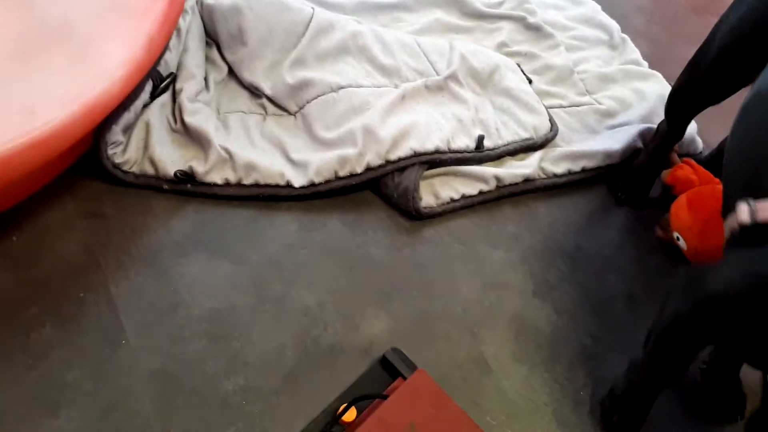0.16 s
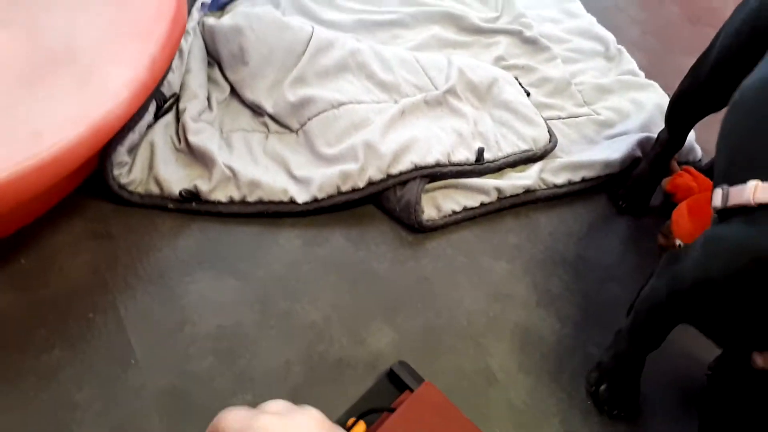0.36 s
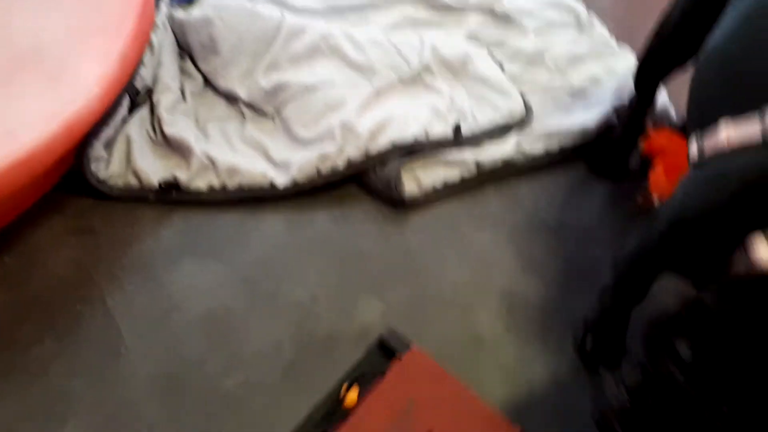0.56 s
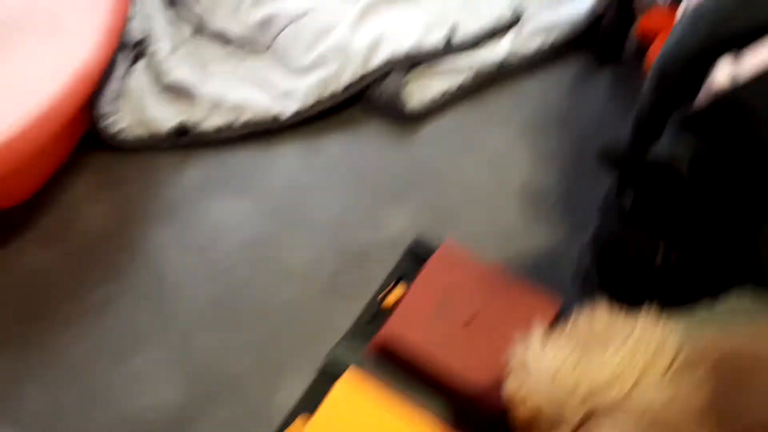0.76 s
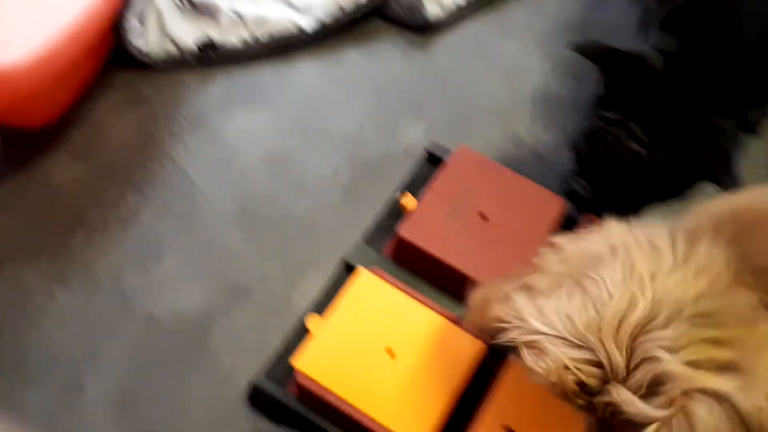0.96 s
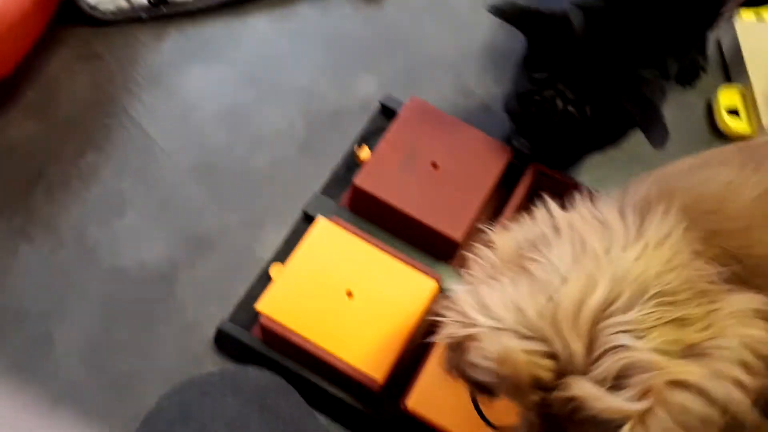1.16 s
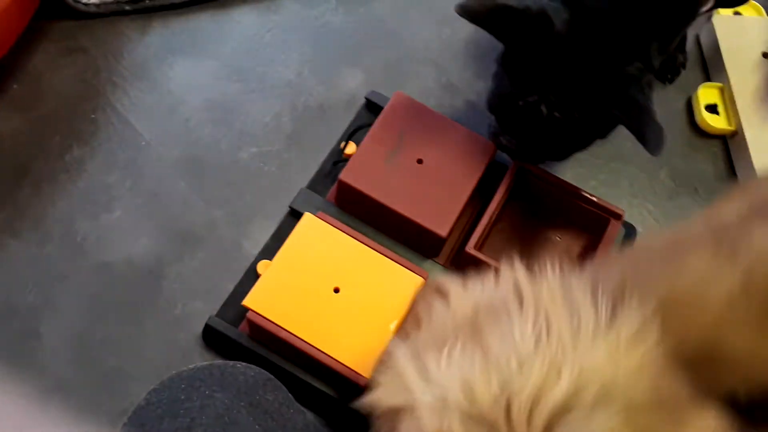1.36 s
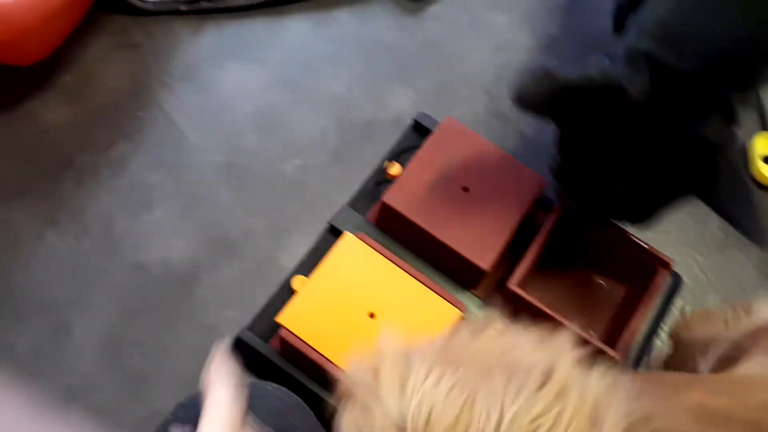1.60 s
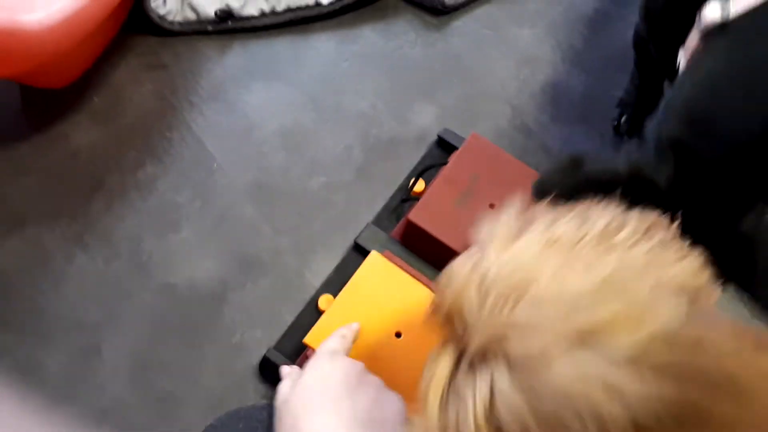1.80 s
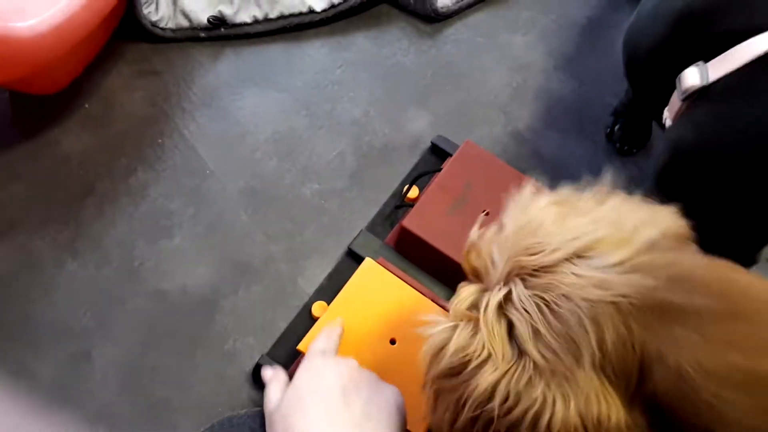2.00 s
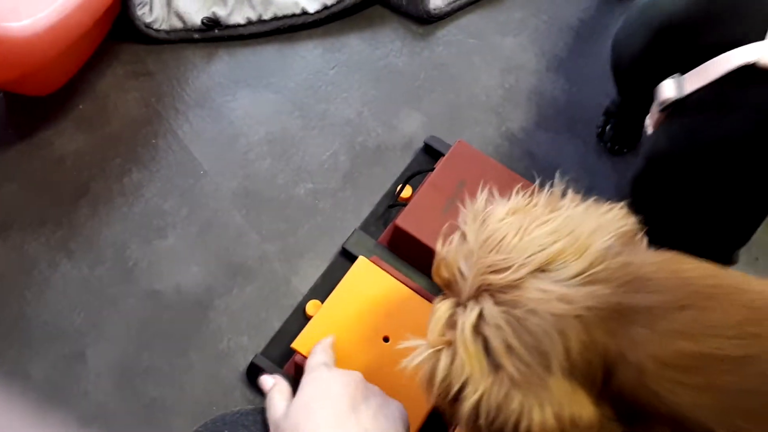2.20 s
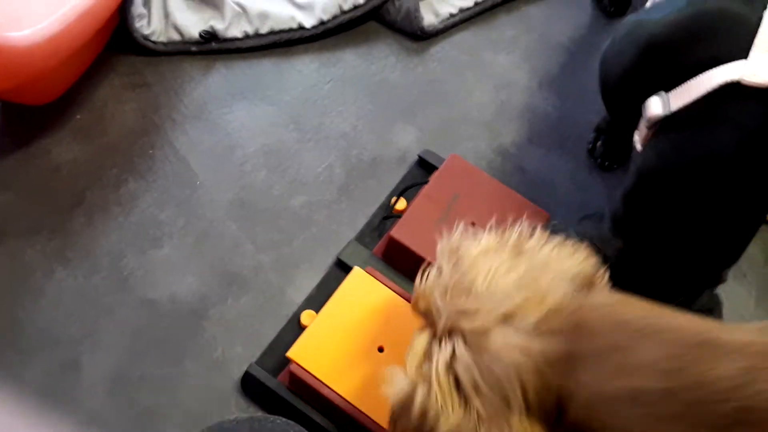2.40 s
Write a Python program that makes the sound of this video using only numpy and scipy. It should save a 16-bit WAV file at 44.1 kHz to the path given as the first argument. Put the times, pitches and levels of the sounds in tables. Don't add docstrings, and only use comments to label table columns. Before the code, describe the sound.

Plastic puzzle board clatter, close in a small, lively room. Airy sniffing opens; at 0.2 s a light lid drops and bounces brightly, then a tray slams loudly at 0.45 s and rattles briefly. From 0.8 to 1.7 s it is quieter, with faint dull paw steps and soft sniffs. At 1.78 s pegs click and the board knocks, a piece scrapes in tiny catches at 1.92, boxy bumps follow at 2.03 and 2.16, then soft steps.

```python
import sys
import numpy as np
from scipy import signal
from scipy.fft import rfft, irfft
from scipy.io import wavfile
from scipy.ndimage import uniform_filter1d

SR = 44100
rng = np.random.default_rng(int(sys.argv[2]) if len(sys.argv) > 2 else 0)


def how_loud(loudness_db):
    steps = np.asarray(loudness_db, float) / 20
    return 10 ** steps


def transcribe(signal):
    frames = np.atleast_2d(signal).T
    limited = np.clip(frames, -1, 1)
    pcm = np.round(limited * 32767).astype(np.int16)
    wavfile.write(sys.argv[1], SR, pcm)


N = 108045
SPAN = 6000


def evened(x):
    return x / np.sqrt(np.mean(x ** 2) + 1e-20)


def read(points, hz):
    f, value = np.transpose(points)
    return np.interp(np.log(hz + 1), np.log(f + 1), value)


def add(mix, s, sound):
    part = mix[..., round(s * SR):][..., :sound.shape[-1]]
    part += sound[..., :part.shape[-1]]


def butter(x, order, hz, kind):
    return signal.sosfilt(signal.butter(order, hz, kind, fs=SR, output="sos"), x)


# f/Hz, level/dB
TICK = [(500, -10), (1500, 3), (4500, -2.5), (7600, -0.5), (9500, -11), (13500, -11.5), (16500, -25.5)]


def struck(hits, modes, setting):
    ring_db, trim_db, cycles, lean_db, free_s = setting
    tick_t60_s, soft_share = 0.013, 0.65
    choke_db, choke_s, choke_hz = -17, 0.0025, 750
    port_rad, side_hz = 1.85, 950
    mono, t = np.zeros(N), np.arange(SPAN) / SR
    hz, db, t60 = np.transpose(modes)[:, :, None]
    colour = how_loud(read(TICK, np.fft.rfftfreq(SPAN, 1 / SR)))
    choke_share = 1 / (1 + (hz / choke_hz) ** 4)
    choke = how_loud(choke_db * np.clip((t - free_s) / choke_s, 0, 1) * choke_share)
    attack = (1 - np.exp(-t * hz / cycles)) ** 2
    hardest_db = max(tick_db - blow_db for _, blow_db, tick_db in hits)
    for s, blow_db, tick_db in hits:
        treble = np.clip(np.log2(hz / 500) / 3, 0, 1)
        soft_db = soft_share * (tick_db - blow_db - hardest_db) * treble
        luck = rng.standard_normal((len(modes), 2, 1))
        level = how_loud(db + soft_db + 1.5 * luck[:, 0] - 60 * t / t60)
        ring = level * np.sin(2 * np.pi * hz * (1 + 0.01 * luck[:, 1]) * t)
        ring = ring * attack * choke
        tick = evened(irfft(rfft(rng.standard_normal(SPAN)) * colour))
        add(mono, s, how_loud(blow_db + ring_db) * ring.sum(0))
        add(mono, s, how_loud(tick_db + trim_db - 60 * t / tick_t60_s) * tick)
    mono = butter(mono, 4, 0.8 * hz.min(), "high")
    f, side = np.fft.rfftfreq(N, 1 / SR), np.array([[0.5], [-0.5]])
    phase = np.exp(1j * side * port_rad * f ** 2 / (f ** 2 + side_hz ** 2))
    lean = how_loud(side * lean_db * f / (f + 2500))
    return irfft(rfft(mono) * phase * lean, N)


# t/s, blow level/dB, tick level/dB
LID_HITS = [(0.2058, 0, -28), (0.215, -15.5, -50.5), (0.223, -16, -43), (0.232, -17, -52.5),
            (.241, -22.5, -53), (.251, -22, -56.5), (0.2605, -11, -49), (.269, -26, -56.5),
            (0.277, -24.5, -57.5), (0.287, -22, -60.5), (.299, -34.5, -59), (0.305, -26, -45.5),
            (0.309, -36, -39), (0.339, -22, -54.5), (.35, -36.5, -60), (0.3615, -26, -62.5),
            (.373, -25, -64), (0.381, -23, -57), (.393, -34, -67.5), (.426, -48.5, -49)]
# f/Hz, level/dB, t60/s
LID_MODES = [(443.3, -6, 0.04), (508, -3, 0.03), (1060, -4, 0.025), (1494, 4.5, 0.018), (2110, 3, 0.01),
             (2374, 3, 0.017), (3300, -4.5, .008), (4100, -2, 0.016)]
LID_SET = (0.7, 3.5, 1.05, 5, 0.33)


def lid():
    return struck(LID_HITS, LID_MODES, LID_SET)


# t/s, blow level/dB, tick level/dB
TRAY_HITS = [
    (.4435, -24.5, -70),
    (.4475, -4.5, -14),
    (.4502, -10, -18.5),
    (.4608, -18.5, -39),
    (.476, -22, -40),
    (.483, -23, -42),
    (.491, -19, -40),
    (.502, -23, -43),
    (.513, -23, -32.5),
    (.535, -25.5, -30),
]
# f/Hz, level/dB, t60/s
TRAY_MODES = [(385.7, 4, 0.13), (422, 0.5, 0.09), (530, -3.5, 0.065), (690.6, -1.5, 0.059),
              (831, -1.5, 0.051), (1061, -3, 0.037), (1217, -3, 0.021), (1411, -4.5, 0.042),
              (1861, -10.5, 0.069), (2560, -14, .02), (4127, -4, 0.031), (4280, -6, 0.02),
              (5060, -17.5, 0.059)]
TRAY_SET = (-4.5, 2, 0.38, 12, -0.17)


def tray():
    return struck(TRAY_HITS, TRAY_MODES, TRAY_SET)


# t/s, blow level/dB, tick level/dB
PEG_HITS = [
    (1.7765, -18, -39.5),
    (1.779, -24, -36),
    (1.782, -31, -33),
    (1.789, -25, -41),
    (1.796, -38.5, -56),
    (2.218, -40, -49.5),
]
# f/Hz, level/dB, t60/s
PEG_MODES = [(502, -1, 0.024), (1706, -8.5, .04), (1816, -7, 0.083), (2800, -8, 0.03), (3770, 2, 0.032),
             (4050, 1, 0.039), (7100, -10.5, 0.02)]
PEG_SET = (-1.5, 5.5, 1.4, 9, 2.5)


def pegs():
    return struck(PEG_HITS, PEG_MODES, PEG_SET)


# t/s, blow level/dB, tick level/dB
BOARD_HITS = [
    (1.8015, -31, -55),
    (1.8065, -17.5, -47),
    (1.811, -18, -27.5),
    (1.816, -11.5, -29),
    (1.8255, -19.5, -52),
    (1.8355, -25, -47),
    (1.8405, -22, -48),
]
# f/Hz, level/dB, t60/s
BOARD_MODES = [(199.6, 1, 0.042), (420, -0.5, 0.034), (487, -3, 0.065), (866, -12, 0.055),
               (1324, -8, 0.018), (1682, -8, 0.046), (2666, -14.5, 0.035)]
BOARD_SET = (0.2, 8.6, 0.65, 1.9, 0.015)


def board():
    return struck(BOARD_HITS, BOARD_MODES, BOARD_SET)


# t/s, blow level/dB, tick level/dB
BOX_HITS = [(2.026, -42, -30.5), (2.029, -20.5, -29), (2.0375, -20.5, -36), (2.05, -33, -55),
            (2.057, -37, -53), (2.068, -39, -55), (2.075, -39.5, -55), (2.087, -34, -66), (2.097, -43, -56),
            (2.114, -43, -68), (2.123, -37.5, -70), (2.148, -40, -76), (2.155, -35.5, -32),
            (2.159, -24, -38.5), (2.172, -23.5, -51), (2.19, -36, -54), (2.2, -39, -60), (2.211, -35, -65),
            (2.252, -37.5, -79), (2.446, -44.5, -63)]
# f/Hz, level/dB, t60/s
BOX_MODES = [(191, -10, 0.074), (398, -2, 0.074), (439.5, 4, 0.038), (539, -9, 0.05), (874, -5.5, 0.021),
             (1420, -9, 0.062), (1819, -1.5, 0.039)]
BOX_SET = (0.24, 5.6, 0.65, 4.3, 0.0072)


def box():
    return struck(BOX_HITS, BOX_MODES, BOX_SET)


# t/s, blow level/dB, tick level/dB
SLIDE_HITS = [
    (1.9195, -26, -49),
    (1.9245, -32, -33.5),
    (1.931, -34, -57),
    (1.937, -37, -48),
    (1.9425, -29.5, -33),
    (1.9455, -31.5, -36),
    (1.95, -35, -39.5),
    (1.957, -33.5, -52),
    (1.964, -47, -52),
    (1.972, -42, -61),
]
# f/Hz, level/dB, t60/s
SLIDE_MODES = [(462, -2, 0.034), (1060, -1, .02), (1468, 0, 0.035), (1930, -8, 0.03), (2980, -10, 0.026),
               (4140, -0.5, 0.016)]
SLIDE_SET = (3.3, 4.9, 0.64, 5.1, 0.0066)


def slide():
    return struck(SLIDE_HITS, SLIDE_MODES, SLIDE_SET)


# t/s, level/dB, f/Hz
STEPS = [(0.809, -60.5, 183.3), (0.854, -58, 278), (0.944, -59, 169), (1.222, -54.5, 137),
         (1.244, -48.5, 125), (1.26, -47, 216), (1.379, -52, 119.4), (1.401, -50.5, 270),
         (1.479, -55.5, 135), (2.269, -42.5, 270.6), (2.293, -42, 153.4), (2.405, -50.5, 287),
         (2.422, -42.5, 223)]
# t/s, level/dB, f/Hz
BOOMS = [
    (.452, -37.5, 165),
    (0.509, -45, 133.5),
    (2.044, -42, 122),
    (2.16, -43, 113),
]


def floor():
    step_cycles, step_db, attack_s = 14.8, 7.5, 0.0029
    out, t = np.zeros(N), np.arange(SPAN) / SR
    ratio, share = np.array([[0.75], [1], [1.8]]), np.array([[0.45], [1], [0.45]])
    for s, db, hz in [*STEPS, *BOOMS]:
        tune, turn = rng.random((2, 3, 1))
        cycles = np.sin(2 * np.pi * (hz * ratio * (0.899 + 0.22 * tune) * t + turn))
        level = how_loud(db + step_db - 60 * t * hz / step_cycles) * (1 - np.exp(-t / attack_s))
        add(out, s, level * (cycles * share).sum(0))
    return np.array([out, out])


# f/Hz, correlation
SAME = [(60, 0.93), (380, .97), (1200, .45), (2600, 0.1), (15000, 0.05)]


def alike(left, other, hz):
    same = np.clip(read(SAME, hz), -1, 1)[:, None]
    return np.array([left, same * left + np.sqrt(1 - same ** 2) * other])


def hiss(shape, patchy_db, rings=()):
    frame, whistle_db = 512, 5
    hz = np.fft.rfftfreq(frame, 1 / SR)
    a, b, c, d, patches = rng.standard_normal((N // 128 + 5, 257, 5)).T
    patches = uniform_filter1d(patches, size=5, axis=0)
    patches = evened(uniform_filter1d(patches, size=12, axis=1))
    db = read(shape, hz)
    for f, width, _ in rings:
        db = db + whistle_db * np.exp(-((hz - f) / (width + 60)) ** 2)
    z = alike(a + 1j * b, c + 1j * d, hz) * how_loud(db[:, None] + patchy_db * patches)
    both = signal.istft(z, nperseg=frame, noverlap=384)[1][:, :N]
    return both / np.sqrt(np.mean(both.mean(0) ** 2))


def sniff(effort, nose, rings, lean_db):
    s, db = np.transpose(effort)
    times = [s[0] - 0.03, *s, s[-1] + 0.052]
    levels = [-85, *db, -72 - 20 * (s[0] > 0.5)]
    level = np.interp(np.arange(N) / SR, times, levels, right=-95)
    return hiss(nose, 0.5, rings) * how_loud(level) * how_loud([[lean_db / 2], [-lean_db / 2]])


# t/s, level/dB
SNIFF_A = [(0.0, -47), (0.156, -46), (0.175, -51)]
SNIFF_B = [(.92, -80), (1.0, -68), (1.1, -57), (1.2, -66), (1.45, -74.5)]
SNIFF_C = [(1.48, -81), (1.533, -61.5), (1.538, -54), (1.72, -53), (1.77, -58)]
SNIFF_D = [(2.38, -77.5), (2.42, -70), (2.45, -67)]
# f/Hz, level/dB
NOSE_A = [(35, -30), (60, 2.5), (194, -13.5), (311, -2.5), (2900, -12.5), (4970, -8.5), (9370, -12.5),
          (15300, -18), (16500, -25.5)]
NOSE_B = [(470, -51), (800, -24.5), (1630, -4.5), (2560, -11), (4040, -11), (6780, -15.5), (9000, -29.5),
          (11700, -59), (19800, -120)]
NOSE_C = [(350, -62.5), (600, -23), (961, -6), (1340, -9.5), (5070, -3), (8830, -7.5), (10900, -6.5),
          (15600, -16.5), (16500, -27.5)]
# f/Hz, width/Hz, boost/dB (unused)
RING_A = [(4900, 300, 0), (10000, 670, -2)]
RING_B = [(4080, 300, 0), (7100, 550, -4)]
RING_C = [(1000, 66, -2), (4860, 240, 0), (11600, 780, -6)]


def noses():
    return (sniff(SNIFF_A, NOSE_A, RING_A, lean_db=2) + sniff(SNIFF_B, NOSE_B, RING_B, lean_db=2.3)
            + sniff(SNIFF_C, NOSE_C, RING_C, lean_db=1) + sniff(SNIFF_D, NOSE_C, RING_C, lean_db=1))


def flutter(x):
    flutter_hz, share = 700, 0.92
    top = butter(x, 2, 550, "high")
    shake = evened(butter(rng.standard_normal(N), 2, flutter_hz, "low"))
    return x - top + top * (np.sqrt(1 - share) + np.sqrt(share) * shake)


# f/Hz, t60/s
ROOM = [(150, 0.33), (400, 0.42), (2000, 0.5), (14000, 0.47)]
# f/Hz, level/dB
WET = [(200, -16), (420, -13), (800, -9), (2000, -9), (3200, -8.5), (4500, -12), (7500, -7), (11000, -10.5)]


def room(x):
    hush_s, hush_db_per_s = 0.23, 109.5
    lean_db = 1.5
    taps, at = np.zeros((2, SR)), np.arange(200, SR - 20, 20)
    shape = (2, len(at))
    np.put_along_axis(taps, at + rng.integers(0, 20, shape), rng.choice([-1., 1.], shape), 1)
    hz, t, z = signal.stft(taps, SR, nperseg=256)
    z = z * how_loud(-60 * t / read(ROOM, hz)[:, None] - hush_db_per_s * np.maximum(t - hush_s, 0))
    z = alike(z[0], z[1], hz)
    z = z / np.sqrt((abs(z) ** 2).mean((0, 2), keepdims=True))
    side = np.array([0.5, -0.5])[:, None, None]
    z = z * how_loud(lean_db * side * (hz / (hz + 2500))[:, None])
    tail = signal.istft(z * how_loud(read(WET, hz))[:, None], SR, nperseg=256)[1]
    flat = signal.istft(z, SR, nperseg=256)[1]
    return signal.fftconvolve(x[:1], tail / np.linalg.norm(flat[0]), axes=1)[:, :N]


# f/Hz, level/dB
AIR = [(25, -14.5), (87, 4.5), (288, -3.5), (633, -15), (3000, -29), (7600, -20.5), (8600, -39.5),
       (15500, -32.5)]


def air():
    return how_loud(-59) * hiss(AIR, patchy_db=4.8)


def scene():
    slam = tray()
    near = lid() + pegs() + board() + box() + slide() + floor()
    echo = room(flutter(near + how_loud(3) * slam))
    return near + slam + echo + noses() + air()


def band_limit(x):
    return signal.sosfilt(signal.butter(12, 16620, fs=SR, output="sos"), x)


def record(dry):
    edge_hz, mic_low_hz = 16000, 60
    edge = signal.firwin(255, edge_hz, window=("kaiser", 9), fs=SR)
    mix = signal.oaconvolve(dry, edge[None], "same")
    mix = butter(mix, 2, mic_low_hz, "high")
    return band_limit(mix)


dry = scene()
out = record(dry)
transcribe(out)
```